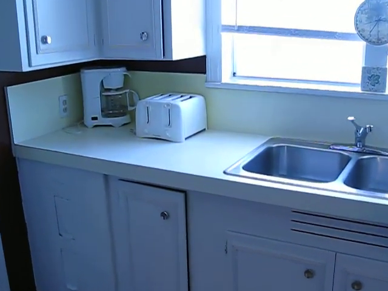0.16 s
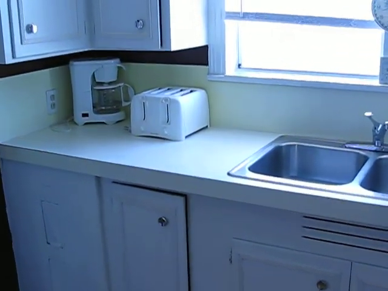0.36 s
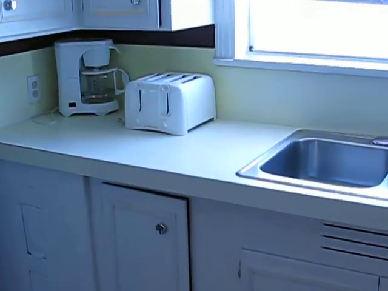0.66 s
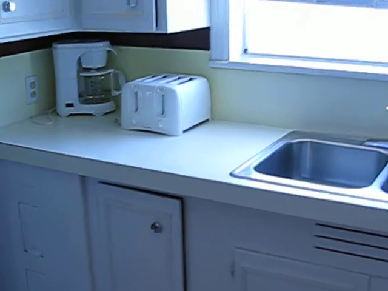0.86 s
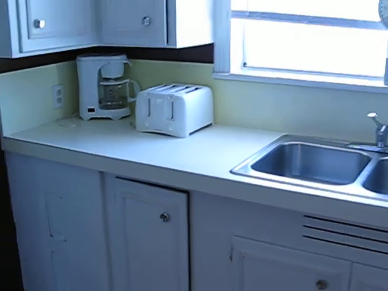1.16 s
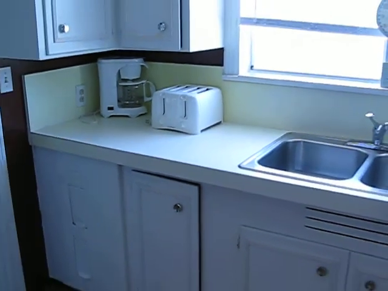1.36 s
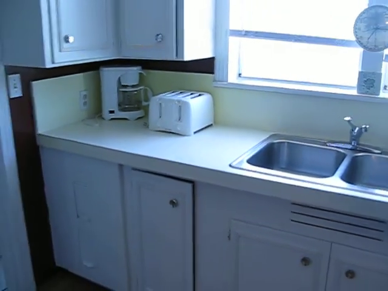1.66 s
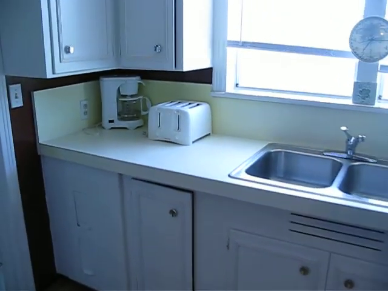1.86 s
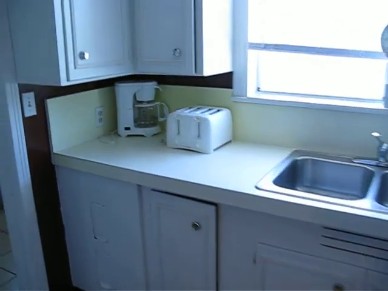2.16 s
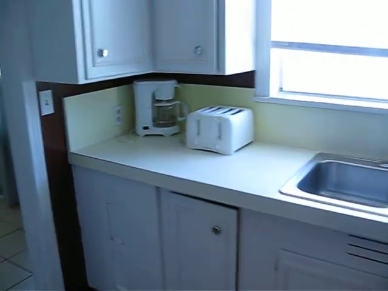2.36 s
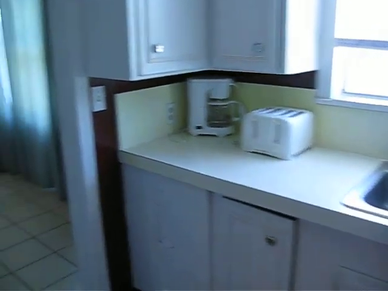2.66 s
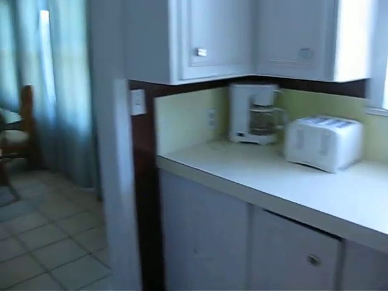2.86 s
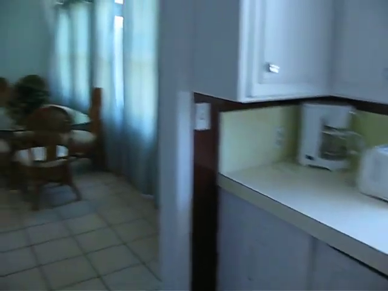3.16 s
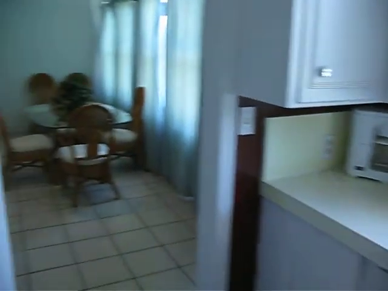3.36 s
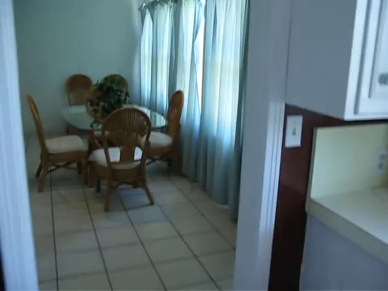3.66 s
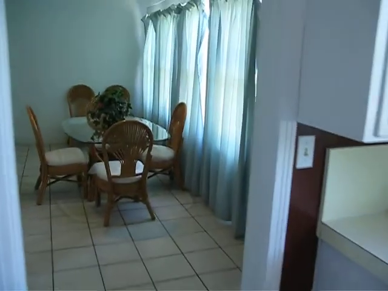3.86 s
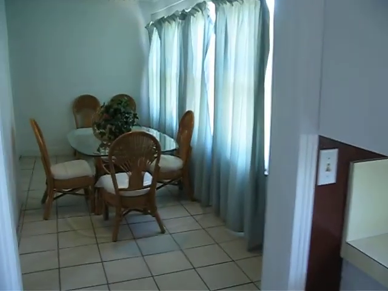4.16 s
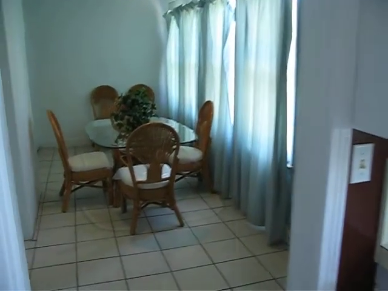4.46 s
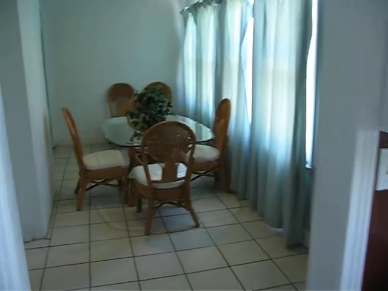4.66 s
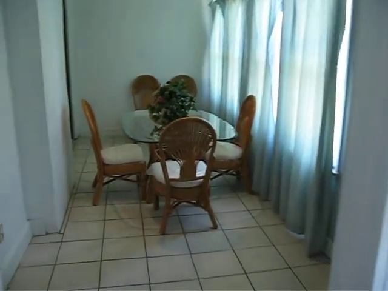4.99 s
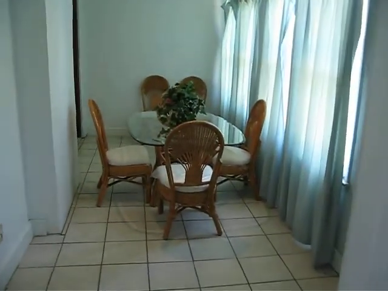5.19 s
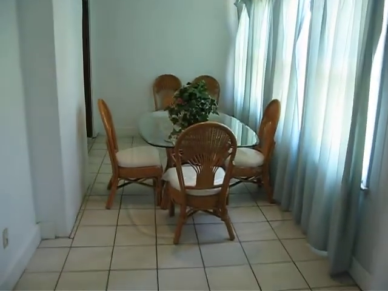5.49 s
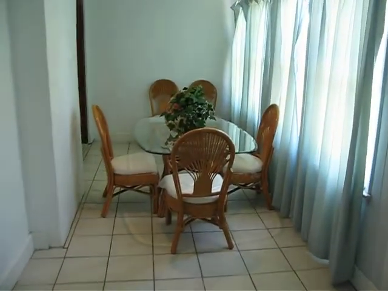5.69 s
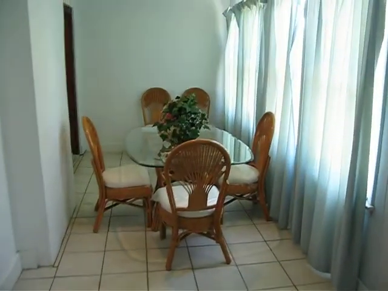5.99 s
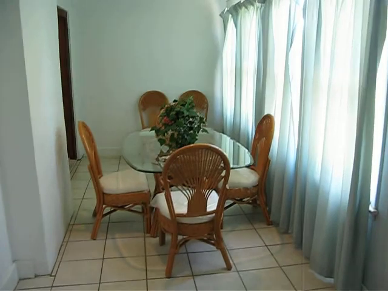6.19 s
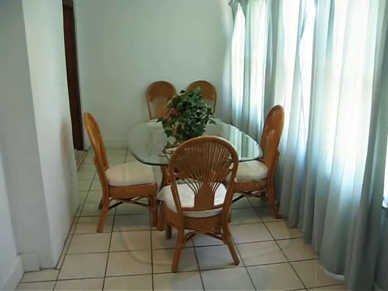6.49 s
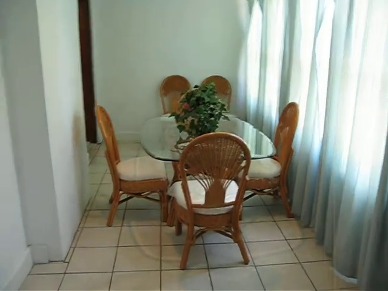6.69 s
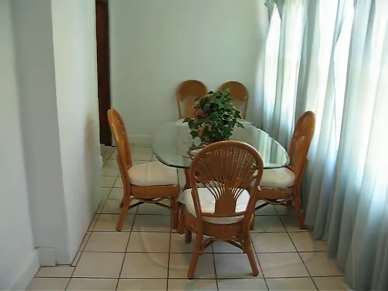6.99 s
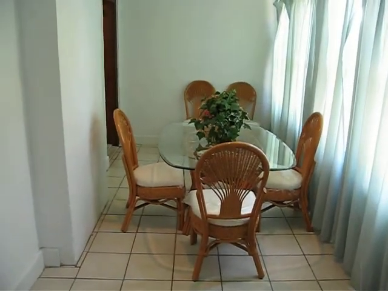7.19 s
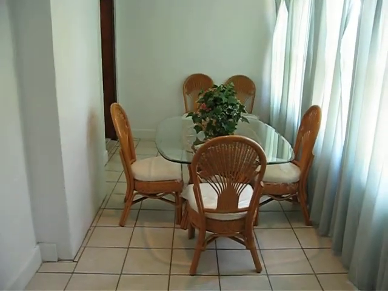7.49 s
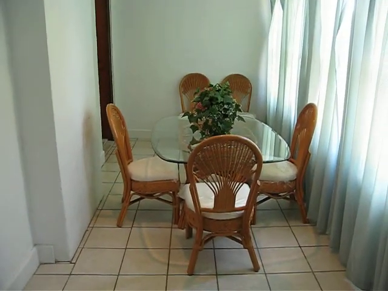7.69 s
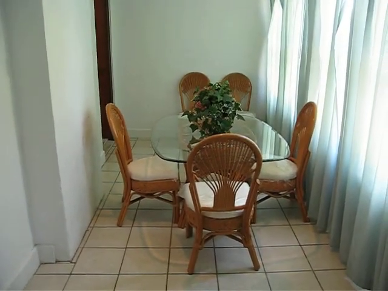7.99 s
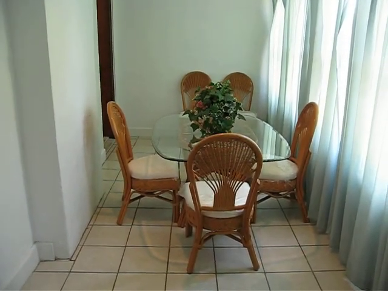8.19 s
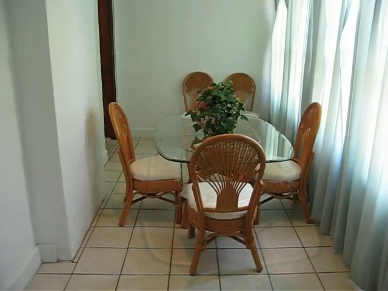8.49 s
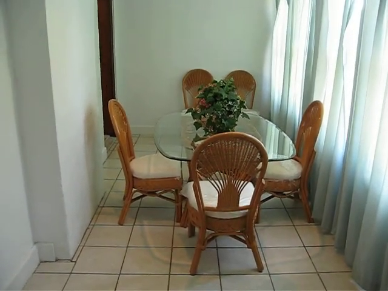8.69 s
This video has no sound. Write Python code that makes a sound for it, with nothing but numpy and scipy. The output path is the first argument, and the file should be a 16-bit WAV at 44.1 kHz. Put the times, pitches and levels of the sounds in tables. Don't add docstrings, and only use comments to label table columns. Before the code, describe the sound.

Hard heels step slowly across a tiled floor in an echoing bare room while plastic camera casing clicks and snaps close to the microphone.

```python
import sys
import numpy as np
from scipy import signal
from scipy.fft import rfft, irfft
from scipy.io import wavfile
from scipy.ndimage import uniform_filter1d

SR = 44100
rng = np.random.default_rng(int(sys.argv[2]) if len(sys.argv) > 2 else 0)


def bounce(signal):
    frames = np.transpose(np.atleast_2d(signal))
    limited = np.clip(frames, -1, 1)
    pcm = np.round(limited * 32767).astype(np.int16)
    wavfile.write(sys.argv[1], SR, pcm)


def volts_from_db(level):
    exponent = np.asarray(level, float) / 20
    return 10 ** exponent


N = 389844

# pitch_hz, level_db (per Hz)
AIR_COLOUR = [(12, -38), (20, -9), (53, -5), (377, -3), (825, -5), (3340, -14), (8410, -18.5), (16000, -28)]

# start_s, peak_db, shell_hz, upper_shell_db, upper_shell_hz
CASE_TICKS = [(0.291, -32, 988, -24, 2970), (0.601, -23.5, 1500, -11, 5500), (0.827, -9.5, 2020, 6.5, 4170),
              (3.4, -20.5, 1490, -23, 3000), (3.419, -35, 1430, -8, 3630), (3.654, -16.5, 1840, 8, 3600),
              (4.735, -13, 2000, 8.5, 3130), (4.952, -40, 1370, -19, 3790), (5.123, -31, 1190, 6.5, 4330),
              (5.724, -10, 1750, 2, 3500), (7.424, -17, 1440, -13, 3140)]
# start_s, stop_s, level_db (halfway through)
CASE_CREAKS = [
    (0.316, 0.379, -45),
    (0.733, 0.824, -46.5),
    (2.223, 2.27, -59),
    (3.603, 3.645, -46),
    (4.715, 4.724, -44),
    (5.425, 5.478, -58),
    (5.7, 5.72, -47),
]
# pitch_hz, width_hz, level_db
CREAK_TONES = [(1820, 230, 0), (3120, 690, -5), (5300, 390, 3.5), (8800, 660, -9), (13000, 8700, -17)]
# start_s, level_db, pitch_hz, fade_s (time to fall 60 dB)
PART_RINGS = [(0.3625, -24, 6300, 0.018), (.376, -26.5, 587, 0.033), (0.376, -33, 309, 0.12),
              (.758, -46, 10800, .02), (2.274, -19, 152, 0.0095), (2.272, -10, 912, 0.028),
              (2.274, -35.5, 317, 0.12), (2.277, -26, 10200, 0.024), (2.285, -45, 2220, 0.46),
              (4.004, -42, 5450, .05), (4.125, -28.5, 3050, 0.038), (4.736, -26, 243, 0.017),
              (4.737, -50, 12900, 0.091), (4.739, -50, 10200, 0.07), (5.725, -26, 202, 0.05),
              (7.435, -22, 10200, 0.02)]
# start_s, peak_db, crackle_db, top_crackle_db, early_s (crackle leads the snap)
CASE_SNAPS = [
    (0.375, -6, -2.5, -10.5, 0.0049),
    (0.672, -35, -1.5, -9, 0.0072),
    (2.273, 1.5, -4, -16, 0.0076),
    (4.733, 8, -8, -8, 0.0062),
    (7.433, -1, -5.5, -10, .0075),
]
# pitch_hz, width_hz, level_db
SHELL_TONES = [(1003, 640, -4.5), (1333, 845, 2), (2080, 780, -2), (3610, 320, -7)]
# pitch_hz, width_hz
CRACKLE_BAND = (5730, 3100)
# pitch_hz, width_hz, level_db
TOP_CRACKLE_TONES = [(9100, 1600, 14), (10200, 120, 6), (12900, 2800, 13.5)]

# pitch_hz, fade_s (time to fall 60 dB)
WALL_FADES = [(250, 0.53), (700, 0.58), (2000, 0.74), (5000, 0.67), (11000, 0.63)]
# start_s, peak_db, thud_db, edge_db, grit_db
HEEL_STRIKES = [
    (1.523, -19, -11, -3, -17),
    (2.512, -10, -18, -3.5, -10),
    (3.483, -9.5, -19, 1.5, -9),
    (4.573, -15.5, -11.5, -10, -26),
    (5.484, -8, -18, 0, -10.5),
    (6.403, -12, -42, -2, -14.5),
    (6.406, -11.5, -19, -14, -15),
    (8.586, -23.5, -15.5, -7, -9.5),
]
# pitch_hz, width_hz, level_db
SLAB_TONES = [(211.4, 61, 2.5), (384, 140, 7.5), (142, 55, -6.5)]
# pitch_hz, width_hz
HEEL_BLOCK = (708, 480)
# pitch_hz, width_hz
HEEL_TIP = (1700, 2200)
# pitch_hz, width_hz
SAND_BAND = (3370, 2770)

# start_s, level_db, pitch_hz, length_s
SOLE_SKIDS = [(1.738, -50, 895, 0.037), (1.744, -49, 3700, 0.029), (2.065, -56.5, 11000, 0.034),
              (2.131, -55, 8800, .046), (3.161, -57.5, 5330, .12), (3.167, -54, 540, 0.25),
              (3.707, -37.5, 3870, 0.01), (3.726, -43.5, 1500, 0.025), (4.745, -40, 2160, 0.0064),
              (5.034, -40.5, 6940, 0.076), (5.069, -39, 11500, 0.014), (5.07, -42, 880, .022),
              (5.726, -48, 3460, 0.043), (6.053, -53.5, 6850, 0.085), (6.333, -43.5, 5700, 0.033),
              (8.07, -60, 10000, 0.033), (3.715, -45.5, 12600, 0.032), (5.24, -60, 13000, .013),
              (7.193, -49, 12050, 0.03)]
# start_s, level_db, pitch_hz, length_s
SOLE_BRUSHES = [
    (3.362, -52.5, 9000, 0.033),
    (3.955, -55, 6700, 0.052),
    (4.784, -46.5, 1280, .035),
    (5.144, -47, 584, 0.031),
    (5.707, -59, 12000, 0.1),
    (6.367, -39, 9000, .02),
    (6.949, -58.5, 7000, 0.12),
    (8.597, -53.5, 9000, 0.049),
    (8.772, -49.5, 1190, 0.013),
]
# start_s, level_db, pitch_hz, width_hz, length_s
SOLE_RASPS = [
    (3.713, -33.5, 7500, 1400, 0.0052),
    (3.73, -37, 5360, 2200, 0.011),
    (5.069, -17.5, 9900, 9000, 0.0013),
    (5.072, -19, 5570, 3000, 0.003),
    (5.079, -29, 6360, 4000, .0035),
    (5.085, -31.5, 5200, 1990, 0.016),
    (6.347, -23, 2600, 1300, 0.015),
]

SLIP_MIDDLE_S = 1 / 50
SLIP_TIME = np.arange(SR // 25) / SR - SLIP_MIDDLE_S
SLIP = np.exp(-0.5 * (SLIP_TIME / 0.00006) ** 2)


def reson(x, hz, width):
    hz = min(hz, 0.4 * SR)
    return signal.lfilter(*signal.iirpeak(hz, max(hz / width, 0.6), fs=SR), x)


def body(x, modes):
    return sum((-1) ** k * volts_from_db(db) * reson(x, hz, width) for k, (hz, width, db) in enumerate(modes))


def above(x, hz, order):
    return signal.sosfilt(signal.butter(order, hz, "high", fs=SR, output="sos"), x)


def unit(x):
    return x / np.abs(x).max()


def add(out, s, x):
    i = int(s * SR)
    out[i:i + len(x)] += x[:len(out) - i]


def grit(size, spread_db):
    strength = np.minimum(rng.exponential(size=size), 3)
    x = rng.standard_normal(size) * volts_from_db(spread_db * strength)
    return x / np.std(x)


def air():
    level_db = -49
    f = np.arange(1, N // 2 + 2) * SR / N
    pitch_hz, colour_db = np.array(AIR_COLOUR).T
    colour = volts_from_db(np.interp(np.log(f), np.log(pitch_hz), colour_db))
    noise = colour * rfft(rng.standard_normal(N))
    octave = np.log2(f).astype(int)
    out = np.zeros(N)
    for k in range(2, 15):
        swell_db = 0.5 * np.interp(np.arange(N), np.linspace(0, N, 40), rng.standard_normal(40))
        out += irfft(noise * (octave == k), N) * volts_from_db(swell_db)
    return volts_from_db(level_db) * out / np.std(out)


def case_ticks():
    out, t = np.zeros(N), SLIP_TIME
    rattle_fade_s = 0.016
    for s, db, shell_hz, upper_db, upper_hz in CASE_TICKS:
        fade = volts_from_db(-13 - 60 * np.abs(t) / rattle_fade_s) * (t > 0)
        blow = SLIP + fade * reson(grit(len(t), spread_db=3), 2500, 3500)
        shell = [(shell_hz, 0.5 * shell_hz, -0.5), (0.868 * shell_hz, 0.676 * shell_hz, -3)]
        tick = unit(above(body(blow, shell), 1470, order=2))
        upper = reson(blow, upper_hz, 0.7 * upper_hz)
        upper = reson(upper, upper_hz, 0.7 * upper_hz)
        tick += volts_from_db(upper_db) * unit(upper)
        tick -= above(tick, 6300, order=2)
        add(out, s - SLIP_MIDDLE_S, volts_from_db(db) * tick)
    return out


def case_creaks():
    out = np.zeros(N)
    for start, stop, db in CASE_CREAKS:
        strain = np.linspace(0, 1, int((stop - start) * SR))
        rub = body(grit(len(strain), spread_db=8), CREAK_TONES)
        loudness = volts_from_db(db - 13 * (0.5 - strain)) * np.clip(6 * strain, 0, 1)
        add(out, start, loudness * rub / np.std(rub))
    return out


def part_rings():
    out, t = np.zeros(N), np.arange(SR // 5) / SR
    for s, db, hz, fade_s in PART_RINGS:
        pair = np.sin(2 * np.pi * hz * t) + 0.14 * np.sin(2 * np.pi * 0.51 * hz * t)
        rise = np.clip(t / 0.0015, 0, 1)
        add(out, s, volts_from_db(db - 60 * t / fade_s) * rise * pair)
    return out


def case_snaps():
    out, t = np.zeros(N), SLIP_TIME
    for s, db, crackle_db, top_db, early in CASE_SNAPS:
        build = np.clip((t + early) / early, 0, 1) ** 0.5 * (t > -early)
        run = volts_from_db(-12.5) * build * np.exp(-np.clip(t, 0, 1) / 0.0036)
        swell = run + np.exp(-np.abs(t + 0.000423) / 0.00048)
        blow = SLIP + 0.5 * run * grit(len(t), spread_db=-5.5)
        snap = unit(above(body(blow, SHELL_TONES), 330, order=1))
        snap += volts_from_db(crackle_db) * unit(reson(swell * grit(len(t), spread_db=6.5), *CRACKLE_BAND))
        snap += volts_from_db(top_db) * unit(body(swell * grit(len(t), spread_db=-8), TOP_CRACKLE_TONES))
        add(out, s - SLIP_MIDDLE_S, volts_from_db(db) * snap)
    return out


def walls(x):
    t = np.arange(SR // 2) / SR
    pitch_hz = np.array(WALL_FADES)[:, 0]
    edges = np.sqrt(pitch_hz[1:] * pitch_hz[:-1])
    noise = rfft(rng.standard_normal(len(t)))
    f = np.arange(len(t) // 2 + 1) * SR / len(t)
    band = np.searchsorted(edges, f)
    tail = np.zeros(len(t))
    for k, (_, fade_s) in enumerate(WALL_FADES):
        tail += irfft(noise * (band == k), len(t)) * volts_from_db(-60 * t / fade_s)
    tail *= np.clip((t - 0.0025) / 0.00072, 0, 1)
    tail *= 1 + 1.4 * np.exp(-t / 0.12)
    return signal.fftconvolve(x, tail / np.sqrt(np.sum(tail ** 2)))


def heels():
    out, t = np.zeros(N), np.arange(SR // 4) / SR
    contact_s, delay_s = 0.00012, 0.001
    sole_lag_s, sole_drop_s, crunch_s = 0.00036, 0.0014, 0.046
    counter_lag_s, counter_db, walls_db = 0.0054, -4, 5
    push = -(t / contact_s) ** 2 * np.exp(-t / contact_s)
    for s, db, thud_db, edge_db, grit_db in HEEL_STRIKES:
        knock = unit(reson(push, *HEEL_BLOCK))
        knock -= volts_from_db(thud_db + 5.5) * unit(body(push, SLAB_TONES))
        knock += volts_from_db(edge_db - 2) * unit(reson(push, *HEEL_TIP))
        knock = above(knock, 115, order=3)
        lowers_s = sole_drop_s * volts_from_db(-edge_db)
        sole = np.clip((t - sole_lag_s) / lowers_s, 0, 1) * np.exp(-t / (crunch_s + lowers_s))
        crunch = above(reson(grit(len(t), spread_db=7.5), *SAND_BAND), 2400, order=2)
        step = volts_from_db(db + 1.46) * (knock + volts_from_db(grit_db - 7) * sole * crunch)
        add(out, s + delay_s, step)
        add(out, s + delay_s + counter_lag_s, volts_from_db(counter_db) * step)
        add(out, s + delay_s, volts_from_db(walls_db) * walls(step))
    return out


def scuffs():
    out, t = np.zeros(N), np.arange(SR // 2) / SR

    def broad(hz):
        return min(0.87 * hz, 9000)

    drags = []
    for s, db, hz, lasts in SOLE_SKIDS:
        drags.append((s, db, hz, broad(hz), 0.00087 + 0.049 * lasts, lasts))
    for s, db, hz, lasts in SOLE_BRUSHES:
        drags.append((s, db, hz, broad(hz), 0.72 * lasts, lasts))
    for s, db, hz, width, lasts in SOLE_RASPS:
        drags.append((s, db, hz, width, lasts, lasts))
    for s, db, hz, width, rise, lasts in drags:
        pressure = np.clip(t / rise, 0, 1) ** 2 * np.exp(-(t / (rise + lasts)) ** 3)
        sand = grit(len(t), spread_db=3)
        slide = above(reson(sand, hz, width), 0.62 * hz, order=4)
        scuff = volts_from_db(db + 2) * pressure * slide / np.std(slide)
        add(out, s, scuff)
        add(out, s, volts_from_db(0.5) * walls(scuff))
    return out


def scene():
    case = case_ticks() + case_creaks() + part_rings() + case_snaps()
    return (air() + case + heels() + scuffs())[None]


def roll_off(x):
    return signal.sosfilt(signal.butter(12, 16980, fs=SR, output="sos"), x)


def record(dry):
    recovery_s, ceiling = 0.13, 0.72
    over = np.clip(uniform_filter1d(np.abs(dry), size=64) - 0.12, 0, None)
    keep = np.exp(-1 / (recovery_s * SR))
    held = signal.lfilter([1 - keep], [1, -keep], over)
    ducked = dry / (1 + 25 * held)
    rounded = ceiling * np.tanh(ducked / ceiling)
    dulled = signal.sosfilt(signal.ellip(6, 0.3, 40, 15700, fs=SR, output="sos"), rounded)
    return roll_off(dulled)


dry = scene()
out = record(dry)
bounce(out)
```